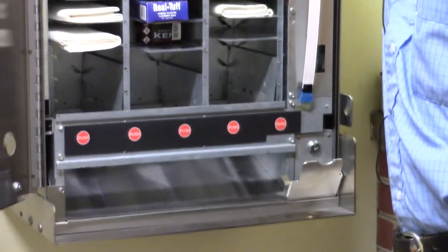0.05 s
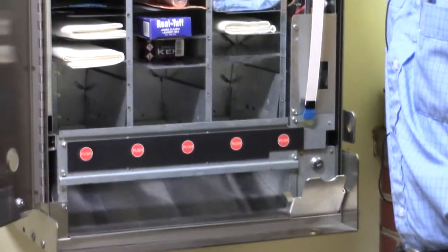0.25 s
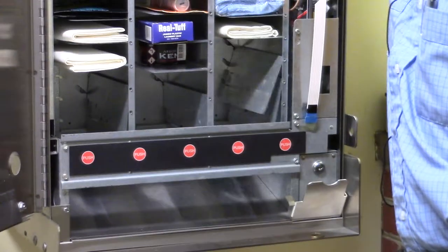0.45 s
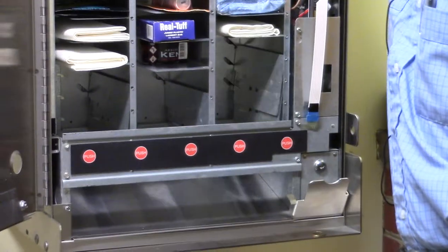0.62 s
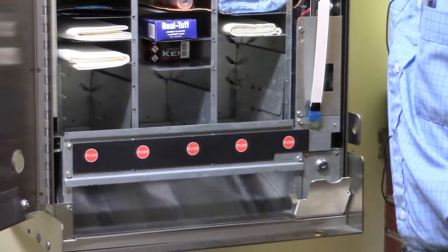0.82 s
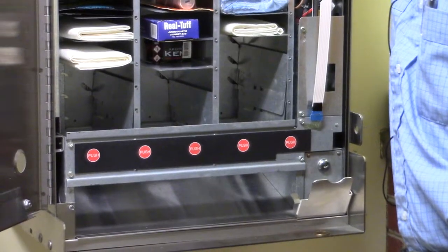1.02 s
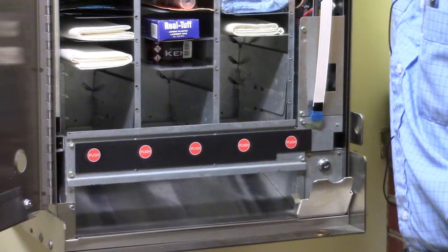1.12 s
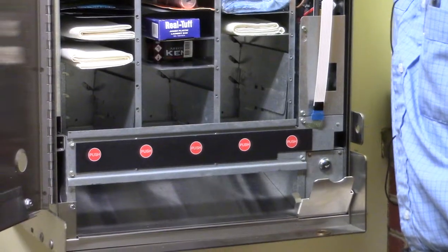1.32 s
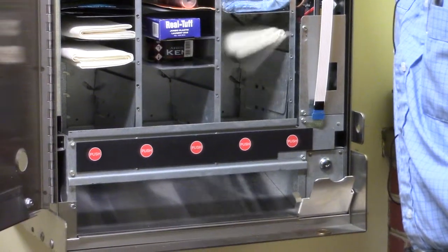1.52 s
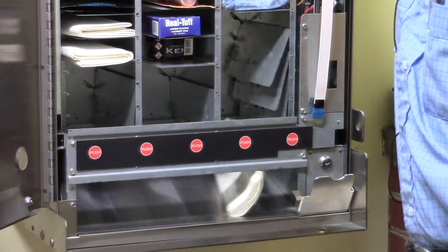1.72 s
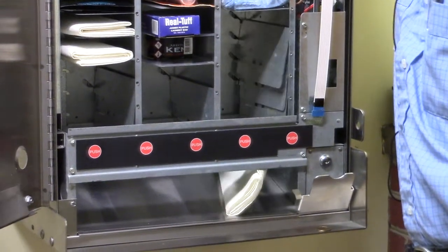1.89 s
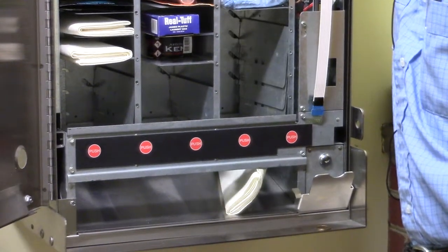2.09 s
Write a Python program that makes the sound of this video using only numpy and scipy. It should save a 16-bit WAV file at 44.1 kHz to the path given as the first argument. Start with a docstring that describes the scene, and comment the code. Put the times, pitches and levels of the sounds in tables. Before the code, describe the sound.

Two metal shelves slam down in turn inside an open steel vending machine, each after a latch click, ringing and clattering as it rebounds. A cloth lands softly in the tray. Heard close in a small, humming room.

```python
"""Two ringing metal slams, each with a clatter: shelves drop in turn in an open steel vending machine.
A latch ticks and knocks free; the hinged shelf swings down, slams against the wall of its column
and rebounds ever more weakly. A folded cloth drops softly into the tray.
The cabinet rings in a small room, over a low hum and a faint whir."""
import sys
import numpy as np
from scipy import signal
from scipy.fft import rfft, irfft, next_fast_len
from scipy.io import wavfile

SR = 44100
rng = np.random.default_rng(int(sys.argv[2]) if len(sys.argv) > 2 else 0)


def output_pcm(signal):
    """Save a mono or channel-first signal as 16-bit PCM at the path in sys.argv[1].

    Samples are clipped to [-1, 1] before scaling.
    """
    pcm = np.clip(np.atleast_2d(signal).T, -1, 1) * 32767
    wavfile.write(sys.argv[1], SR, np.round(pcm).astype(np.int16))


N = 94815
RING_N = 24576  # samples per blow
T = np.arange(RING_N) / SR
RING_HZ = np.fft.rfftfreq(RING_N, 1 / SR)
BASS_HZ, TREBLE_HZ = 725, 6500  # tone corners of a blow


def undb(db):
    """Decibels to gain."""
    return np.exp(np.asarray(db) * np.log(10) / 20)


def unit(x):
    """Scale to rms 1."""
    return x / np.sqrt(np.mean(x ** 2))


def colour(points, hz):
    """Gain at hz of a spectrum (f/Hz, level/dB), mean power 1."""
    f, db = np.array(points).T
    return unit(undb(np.interp(np.log(hz + 1), np.log(f), db)))


def resonance(hz, centre_hz, width_hz):
    """Gain of one peak, mean power 1."""
    return unit(1 / (1 + (2 * (hz - centre_hz) / width_hz) ** 2))


def below(hz, corner_hz):
    """Weight: 1 well below the corner, 0 well above."""
    return 1 / (1 + (hz / corner_hz) ** 4)


def fade(t60_s):
    """Exponential decay."""
    return np.exp(-np.log(1000) * T / t60_s)


def swell(rise_s):
    """Attack from 0 to 1."""
    return 1 - np.exp(-T / rise_s)


def waver(step_s, count=1500):
    """Random curve, spread near 1, through count points step_s apart."""
    return np.interp(T / step_s, np.arange(count), rng.standard_normal(count))


def add(out, start_s, x):
    """Mix x into out from start_s."""
    i = int(start_s * SR)
    out[i:i + len(x)] += x[:N - i]


def background():
    """Room noise and hum; a whir with a thin whine swells before the second shelf is released."""
    # spectra: f/Hz, relative density/dB
    room_spectrum = [(20, -6.5), (55, -3), (100, -5), (200, -4.5), (400, -9), (700, -11), (1200, -13.5),
                     (2000, -21.5), (4000, -30.5), (8000, -42.5), (15500, -57)]
    whir_spectrum = [(100, -12.5), (180, -1), (400, -10), (700, -16.5), (1200, -18.5), (2200, -22.5),
                     (4000, -29.5), (7000, -40.5), (11000, -49.5), (15500, -60)]
    # whir envelope: t/s, level/dB
    whir_levels = [(0, -45.5), (.18, -42.5), (.5, -48), (1.0, -58), (1.12, -38), (1.25, -37), (1.42, -37),
                   (1.7, -50), (2.15, -50)]
    # whine peaks: f/Hz, width/Hz, level re whir/dB
    whine_peaks = [(8050, 50, -35), (8780, 170, -34.5), (9880, 170, -37), (11095, 205, -39),
                   (12320, 200, -45), (13600, 280, -50.5)]
    # hum lines: f/Hz, level/dB
    hum_lines = [(54, -48), (119, -55.5), (167, -56.5), (384, -58)]
    size = next_fast_len(N, real=True)
    t, hz = np.arange(N) / SR, np.fft.rfftfreq(size, 1 / SR)
    noise = lambda gain: irfft(rfft(rng.standard_normal(size)) * gain, size)[:N]
    whine = sum(undb(db) * resonance(hz, f, width_hz) for f, width_hz, db in whine_peaks)
    whir = noise(np.hypot(colour(whir_spectrum, hz), whine))
    whir *= undb(np.interp(t, *np.array(whir_levels).T))
    hum = sum(np.sqrt(2) * undb(db) * np.sin(2 * np.pi * (f * t + rng.random())) for f, db in hum_lines)
    room = undb(-41) * noise(colour(room_spectrum, hz))
    return room + whir + hum


def cloth_thuds():
    """The soft cloth stirs only the lowest resonance of the tray."""
    # landing and settling: t/s, level/dB
    landings = [(1.746, -31), (1.83, -33)]
    tray = resonance(RING_HZ, centre_hz=184, width_hz=33)
    out = np.zeros(N)
    for start_s, db in landings:
        rumble = irfft(rfft(rng.standard_normal(RING_N)) * tray)
        add(out, start_s, undb(db) * rumble * swell(rise_s=.012) * fade(t60_s=.34))
    return out


def knocks():
    """A hard contact drives one strongly damped resonance: a few cycles of swell, then a faint ring."""
    # hollow knocks and clanks: t/s, f/Hz, level/dB, rise/s
    contacts = [(0.2321, 1171, -6, 0.0017), (.437, 565, -14, 0.0029), (.592, 1407, -22, 0.0042),
                (1.4517, 1190, -5, 0.0017), (1.4519, 2446, -12, 0.0012), (1.659, 636, -15, 0.0025),
                (1.815, 1870, -18, 0.003), (1.851, 1335, -25, 0.0043)]
    out = np.zeros(N)
    for start_s, hz, db, rise_s in contacts:
        pulse = T / rise_s * np.exp(1 - T / rise_s)
        tail = undb(-16.5) * swell(rise_s) * fade(t60_s=.62)
        add(out, start_s, undb(db) * (pulse + tail) * np.sin(2 * np.pi * hz * T))
    return out


def cabinet_ripple(depth_db=3, spacing_hz=14):
    """Crowded cabinet resonances as a random gain over frequency."""
    heights = rng.standard_normal(RING_N)
    return unit(undb(depth_db * np.interp(RING_HZ / spacing_hz, np.arange(RING_N), heights)))


def ring(modes, rise_s, bass_db):
    """Clear modes of a struck part; loose parts make them waver, light blows barely move the low ones."""
    waver_db = 4.5
    out = 0
    for hz, db, t60_s in modes:
        level_db = db + min(bass_db, 0) * (hz < BASS_HZ) + waver_db * waver(step_s=.0091)
        out += undb(level_db) * fade(t60_s) * np.sin(2 * np.pi * (hz * T + rng.random()))
    return swell(rise_s) * out


def clash(spectrum, ripple, rise_s, bass_db, treble_db, chatter_db, treble_lag_s):
    """A blow on sheet steel: dense cabinet ring, room tail and a chatter of tiny contacts."""
    # cabinet decay: f/Hz, t60/s
    cabinet_decay = [(150, 0.56), (700, 0.36), (2500, 0.32), (7000, 0.26), (15000, 0.27)]
    bass_lag_s = .0069  # low panels take a moment to swing
    chatter_spread_db, chatter_decay_s = 4.5, .012  # contacts die out as the metal settles
    tone_db = bass_db * below(RING_HZ, BASS_HZ) + treble_db * (1 - below(RING_HZ, TREBLE_HZ))
    gain = colour(spectrum, RING_HZ) * undb(tone_db)
    dense = rfft(rng.standard_normal(RING_N)) * gain * ripple
    room_tail = undb(-9) * fade(t60_s=.41)
    centres_hz, t60s = np.array(cabinet_decay).T
    cabinet = 0
    for hz, t60_s, share in zip(centres_hz, t60s, np.eye(len(centres_hz))):
        band = irfft(dense * np.interp(np.log(RING_HZ + 1), np.log(centres_hz), share))
        lag_s = bass_lag_s * below(hz, BASS_HZ) + treble_lag_s * (1 - below(hz, TREBLE_HZ))
        cabinet += band * swell(rise_s + lag_s) * np.hypot(fade(t60_s), room_tail)
    contacts = unit(rng.standard_normal(RING_N) * undb(chatter_spread_db * waver(step_s=.0006)))
    chatter = irfft(rfft(contacts) * gain * (1 - below(RING_HZ, BASS_HZ)))
    chatter *= swell(rise_s + treble_lag_s) * np.exp(-T / chatter_decay_s)
    return cabinet + undb(chatter_db) * chatter


def latches(ripple):
    """Each latch ticks as it starts to move, then hits its stop."""
    # ticks and knocks: t/s, level/dB, rise/s, bass/dB, treble/dB, ring/dB, chatter/dB
    hits = [(0.2113, -23, 0.0013, -10, 1, 5.5, 1.5), (0.2323, -14.5, 0.0005, 1.5, 2, 3, 3.5),
            (0.2684, -33.5, 0.0022, -10, 16, -1, 6), (1.386, -52, .002, 11, -1, -6, 10),
            (1.41, -42, .002, 6, -9, -8, -11), (1.4323, -21, 0.00058, -3.5, 0, 3.5, -1),
            (1.4512, -14.5, 0.00045, 2.5, 4, 2, 5.5), (1.518, -51, .004, -11, 6, -4, 0)]
    # latch modes: f/Hz, level/dB, t60/s
    modes = [(450, -21, .4), (1012, -22, .35), (1725, -22, .28), (2450, -24, .22), (3263, -22, .22),
             (3945, -14, .3), (3974, -15, .3), (4081, -19, .25), (5032, -12, .21), (7144, -23, .25)]
    # dense ring of the steel: f/Hz, relative density/dB
    spectrum = [(60, -9), (150, -1), (330, -6.5), (520, 1.5), (850, -1), (1200, 5.5), (1550, 0), (2400, 0),
                (4200, -2), (6000, -7), (10500, -10.5), (15500, -17.5)]
    out = np.zeros(N)
    for start_s, db, rise_s, bass_db, treble_db, ring_db, chatter_db in hits:
        tones = undb(ring_db) * ring(modes, rise_s, bass_db)
        steel = clash(spectrum, ripple, rise_s, bass_db, treble_db, chatter_db, treble_lag_s=.0015)
        add(out, start_s, undb(db) * (steel + tones))
    return out


def shelves(ripple):
    """Each shelf slams, clatters and rebounds, ringing with its own modes."""
    # blows: t/s, shelf index, level/dB, rise/s, bass/dB, treble/dB, ring/dB, chatter/dB
    hits = [(.3658, 0, -8, 0.0023, 1, 3, 2, -7), (.396, 0, -17.5, 0.0032, 0, 5.5, 7.5, -5),
            (0.4353, 0, -21.5, 0.00083, 6.5, 7.5, 0.5, 10.5), (0.58, 0, -24.5, 0.007, -14, -5, -1, 10),
            (0.5916, 0, -21, 0.0018, 1, -1.5, -5, 2), (.740, 0, -30, 0.011, -5, -4.5, -10, -0.5),
            (0.769, 0, -34, 0.003, 3.5, -23, -6, 0), (1.5848, 1, -8, 0.0018, 1.5, 1.5, -3.5, -4),
            (1.658, 1, -20, 0.0014, 8, 8, 6.5, 9), (1.792, 1, -22, 0.0067, 4, -3, -2, 1),
            (1.8128, 1, -21, 0.0018, -13, 1.5, 3, 2.5), (1.833, 1, -36, 0.0011, 15, -18, -15, 10),
            (1.9875, 1, -37, 0.0013, 4.5, -3.5, 6.5, 7.5)]
    # modes, one list per shelf: f/Hz, level/dB, t60/s
    modes = [
        [(390.5, -21.5, 0.45), (562, -29, 0.34), (625, -21, 0.48), (1071, -16.5, 0.45), (1168, -17, 0.49),
         (1274, -23, 0.37), (1334, -9.5, 0.23), (1748, -21, .3), (2120, -15.5, 0.314), (2820, -16.5, 0.22),
         (2903, -19.5, 0.249), (4249, -14, 0.25), (4980, -13.5, .18), (5120, -14.5, 0.16)],
        [(392.6, -22, 0.59), (561.3, -20.5, 0.47), (632, -23, 0.43), (705, -20, .4), (1137, -19, 0.38),
         (1196, -15.5, 0.3), (1330, -11.5, 0.28), (1728, -15, 0.18), (1872, -18, 0.27), (2320, -21, 0.37),
         (2877, -22, 0.23), (3330, -21, 0.35), (3780, -19, 0.23), (5030, -22, 0.15)],
    ]
    # dense ring of the steel: f/Hz, relative density/dB
    spectrum = [(60, -23), (150, -10), (330, -7), (600, -1), (900, -3.5), (1250, 1), (1800, -1.5),
                (3000, -1), (4500, -3.5), (5300, -2), (8000, -11), (10500, -9.5), (15500, -18)]
    out = np.zeros(N)
    for start_s, shelf, db, rise_s, bass_db, treble_db, ring_db, chatter_db in hits:
        tones = undb(ring_db) * ring(modes[shelf], rise_s, bass_db)
        steel = clash(spectrum, ripple, rise_s, bass_db, treble_db, chatter_db, treble_lag_s=.00044)
        add(out, start_s, undb(db) * (steel + tones))
    return out


def scene():
    """Mono mix; latches and shelves share the cabinet's resonances."""
    ripple = cabinet_ripple()
    return (background() + latches(ripple) + shelves(ripple) + knocks() + cloth_thuds())[None]


def record(dry):
    """Round the loudest peaks, cut the top."""
    ceiling, top_hz = .92, 15750
    rounded = dry / (1 + (dry / ceiling) ** 6) ** (1 / 6)
    lowpass = signal.ellip(10, .1, 60, top_hz, fs=SR, output="sos")
    return signal.sosfiltfilt(lowpass, rounded)


dry = scene()
out = record(dry)
output_pcm(out)
```